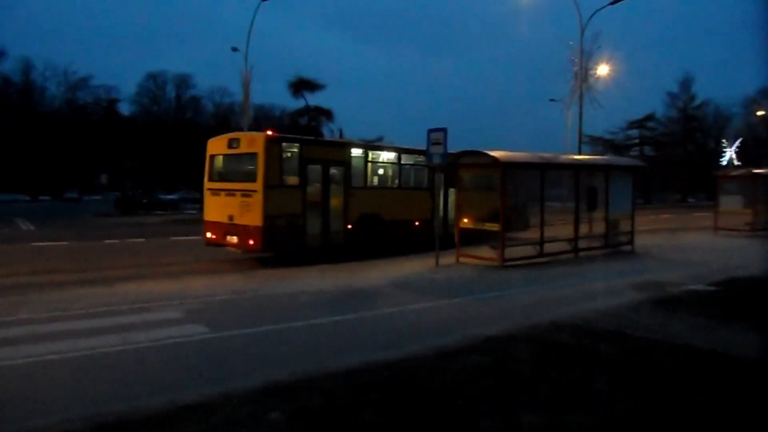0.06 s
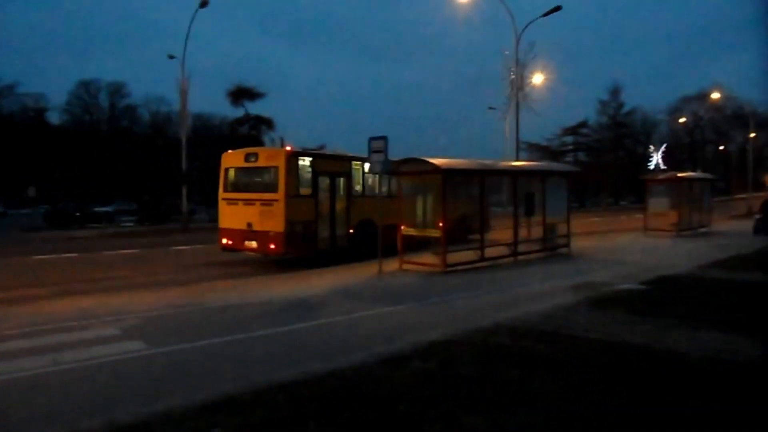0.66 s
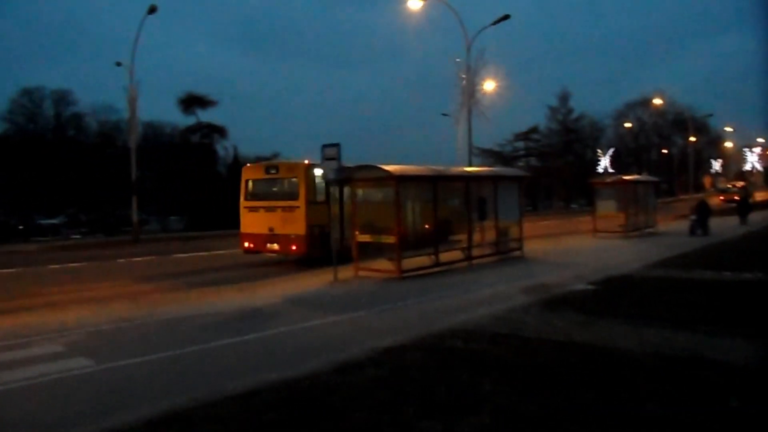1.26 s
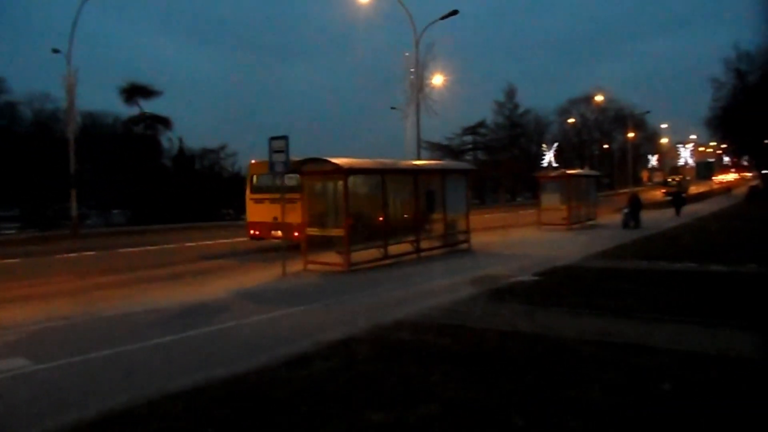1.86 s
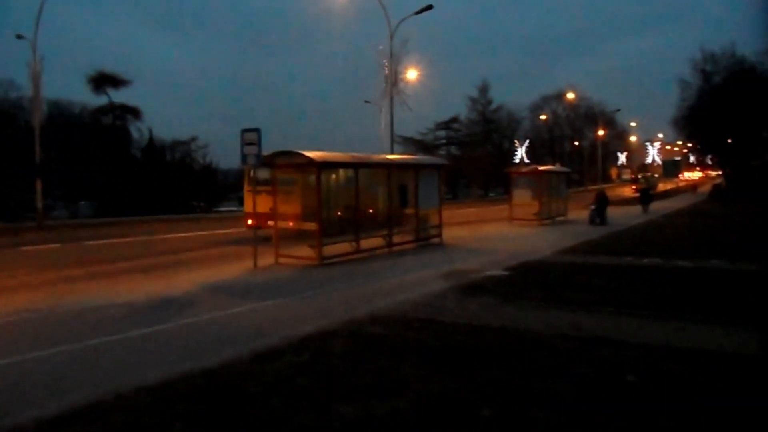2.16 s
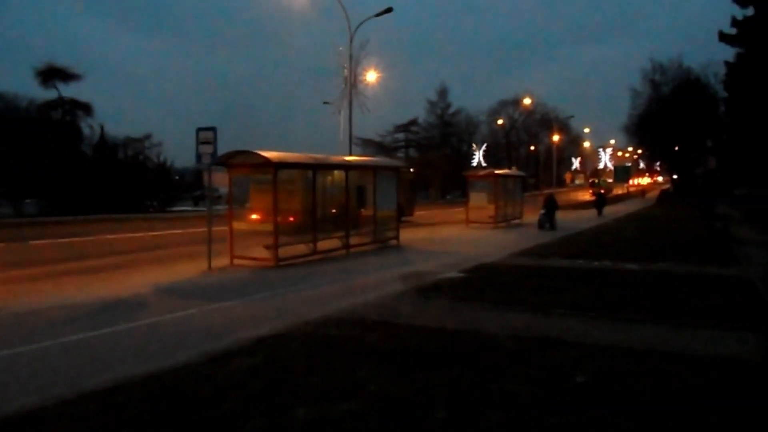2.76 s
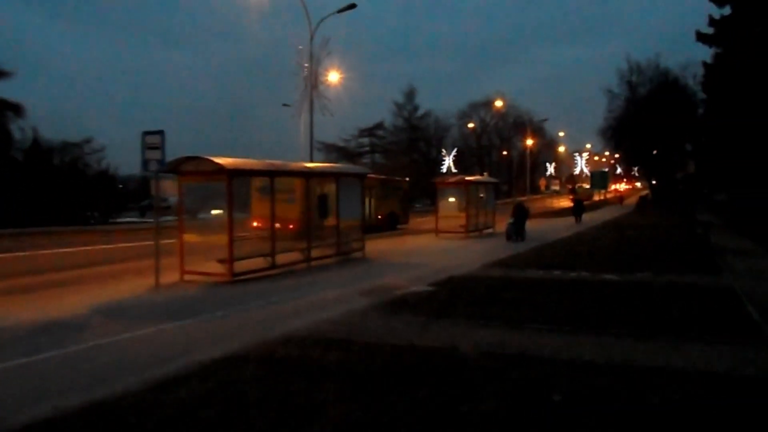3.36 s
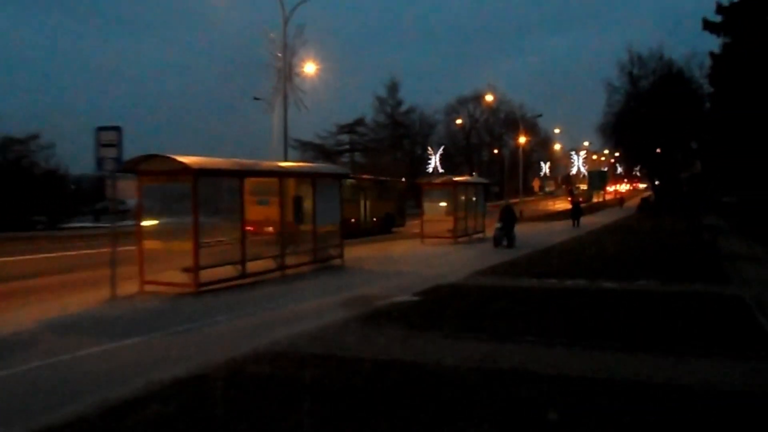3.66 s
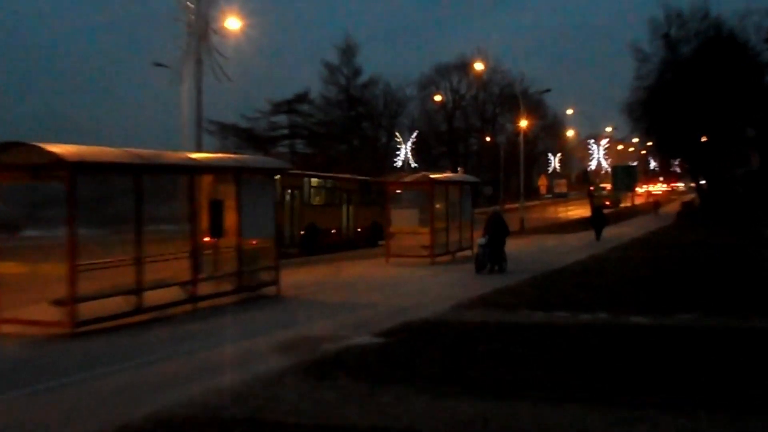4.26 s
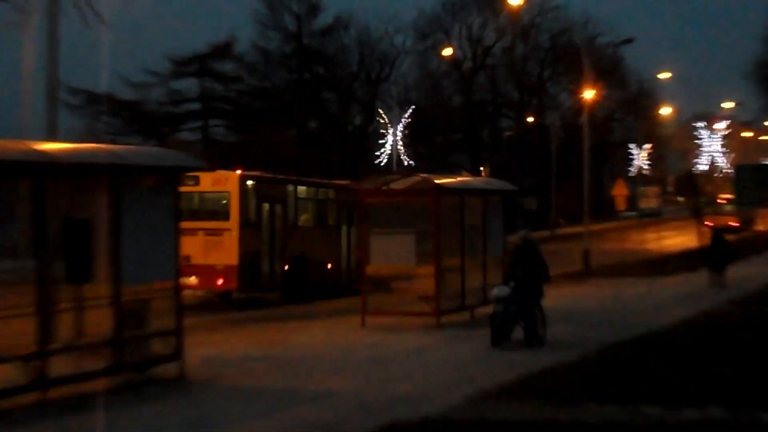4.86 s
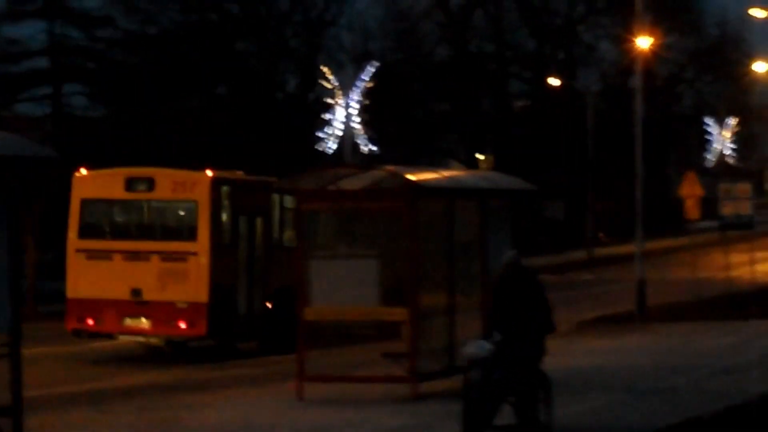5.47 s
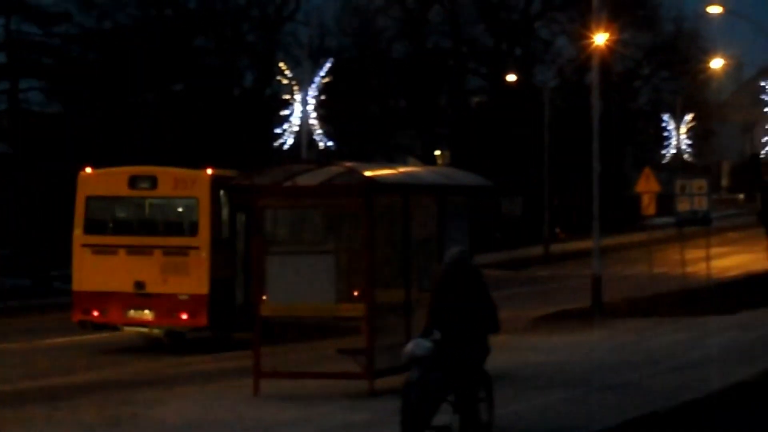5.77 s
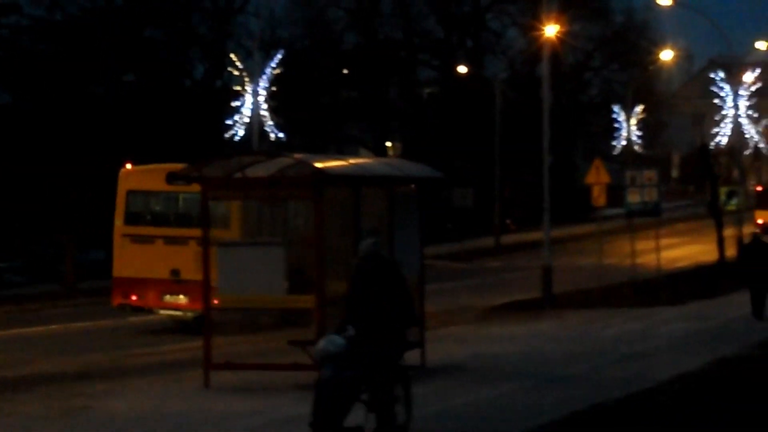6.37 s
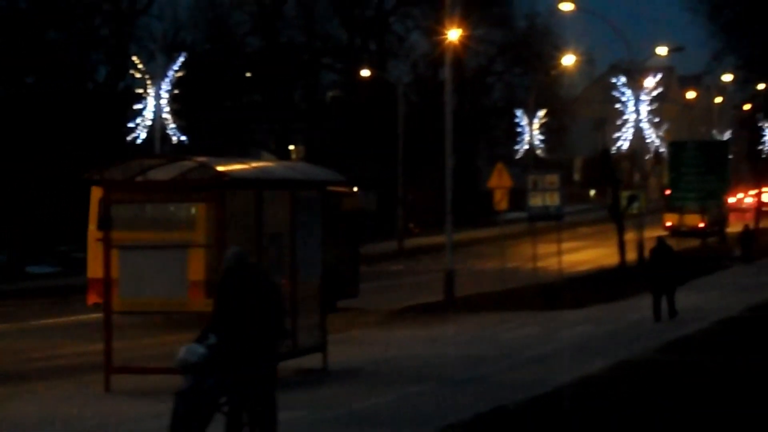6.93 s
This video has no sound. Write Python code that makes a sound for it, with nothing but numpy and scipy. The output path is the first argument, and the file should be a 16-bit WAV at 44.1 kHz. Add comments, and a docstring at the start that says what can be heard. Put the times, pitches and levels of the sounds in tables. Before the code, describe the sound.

A diesel bus is pulling away along a street from the start, with a throbbing exhaust, a clattering engine and a faint gear whine over low distant traffic. Its pitch climbs steadily until about 2.7 seconds, with chugging exhaust thumps from around 1.8 seconds and a light panel clack just after 2. Close to the microphone, a camera's zoom lever ticks at 0.3 seconds and clicks at 2.6, starting a thin lens motor whirr with small ticks. Meanwhile the engine falls in pitch and grows quieter, changing gear at about 4.6 seconds and picking up with a brief blip. At 5.3 seconds the lever snaps back with a sharp, loud click and the whirr stops. The bus drones on, duller and farther away, with low hums swelling and a few faint rattles until the end at about 7 seconds.

```python
"""A street bus stop, distant traffic beneath. A six-cylinder diesel bus revs up, changes gear, drones off.
Cylinder puffs throb in the exhaust and thump near top revs; combustion roars and clatters in the block.
A timing gear whines through its case resonances, loose panels clack, low hums swell far off.
Close by, a camera's zoom lever clicks, its lens motor whirrs and ticks, and the lever snaps back."""
import sys
import numpy as np
from scipy.fft import rfft, irfft, next_fast_len
from scipy.io import wavfile
from scipy.ndimage import uniform_filter1d, map_coordinates

SR = 44100
rng = np.random.default_rng(int(sys.argv[2]) if len(sys.argv) > 2 else 0)


def generate_wav(sig):
    """Save sig (samples, or channels by samples) to the path in sys.argv[1] as 16-bit PCM at SR."""
    pcm = np.round(np.clip(np.atleast_2d(sig).T, -1, 1) * 32767).astype(np.int16)
    wavfile.write(sys.argv[1], SR, pcm)


N = 313110

# Firing rate: t/s, f/Hz
FIRING_RATE = [(0.0, 64.06), (0.6, 74.63), (1.4, 87.64), (2.7, 103.44), (3.5, 79.76), (4.15, 65.0),
               (4.45, 60.25), (4.65, 54.21), (4.93, 70.12), (5.25, 62.5), (5.5, 65.63), (6.5, 69.96),
               (7.1, 71.44)]
# Puff departure from the mean, per cylinder: share/1
CYLINDER_BIAS = [-0.17, 0.85, -0.36, 0.69, 0.35, -0.61]
# Random puff scatter: t/s, share/1
PUFF_SCATTER = [(0, 0.37), (1.5, 0.41), (2.0, 0.72), (4.6, 0.65), (5.5, 0.31)]
# Once-per-cycle swell: t/s, amount/1
CHUG = [(0, 0), (1.6, 0.08), (1.95, 0.08), (2.6, 0.09), (3.0, 0), (7.1, 0)]
# Exhaust fundamental: t/s, level/dB
FIRING_TONE = [(0, -26), (.55, -29.5), (1.35, -26.5), (2.0, -31), (2.62, -29.5), (2.85, -23), (3.3, -24.8),
               (3.58, -33), (3.85, -31), (4.33, -26), (4.65, -34), (4.8, -25.5), (4.95, -31), (5.8, -31.5),
               (7.1, -35)]
# Exhaust overtones: f/firing rate
OVERTONE_ORDERS = [2, 8 / 3, 3]
# Same overtones at full load, on the silencer's main resonance: level/dB
OVERTONE_DB = [-21.5, -27.5, -21]
# Silencer response: f/Hz, gain/dB
SILENCER = [(120, -11.5), (138, -18), (150, -5.5), (175, 0), (193, -5.5), (206, -7.5), (235, -7.5),
            (262, -6), (280, -21.5), (310, -14)]
# Exhaust pipe, low band: f/Hz, gain/dB
THROB_BAND = [(10, -53), (22, -9), (33, 2.5), (45, 11.5), (60, 3), (85, -2), (125, 0), (155, -25),
              (300, -59), (2000, -110)]
# Exhaust pipe, middle band: f/Hz, gain/dB
BOOM_BAND = [(60, -68.5), (115, -6.5), (150, 0.5), (180, 5), (205, -0.5), (235, -12), (400, -53),
             (2000, -110)]
# Exhaust pipe, upper band: f/Hz, gain/dB
DRONE_BAND = [(120, -50), (190, -21), (220, -1), (255, 0.5), (290, -9), (350, -10), (450, -17), (900, -62),
              (3000, -110)]
# Combustion roar, up with load, down with distance: t/s, level/dB
ROAR_LEVEL = [(0, -32.5), (.5, -31), (1.0, -31.5), (1.8, -30), (2.5, -34), (2.95, -40), (3.6, -42),
              (4.6, -44.5), (4.95, -41), (5.5, -45.3), (6.0, -44), (6.5, -46), (7.1, -49)]
# Engine block response: f/Hz, gain/dB
BLOCK_RESPONSE = [(150, -28), (280, 0.5), (350, -1), (420, -6), (510, -4), (580, 1), (690, 2.5), (770, 1),
                  (860, 2.5), (1050, 0.5), (1170, -5), (1400, -16), (2200, -40.5)]
# Clatter, near: f/Hz, level/dB
CLATTER_NEAR = [(900, -24), (1400, 2), (1750, 3), (2100, -0.5), (2800, 0.5), (3350, 0), (3800, -7.5),
                (4200, -3), (5200, -15), (6500, -13.5), (8000, -18), (11000, -20), (12500, -24.5),
                (14000, -32)]
# Clatter, far: f/Hz, level/dB
CLATTER_FAR = [(900, -29), (1400, -1.5), (1750, 5), (2100, -0.5), (2800, -3.5), (3600, -15), (4100, -9),
               (4800, -18), (6300, -19), (9000, -27), (14000, -34)]
# Bus distance: t/s, far share/1
DISTANCE = [(0, 0), (2.0, 0.14), (4.5, 0.75), (7.1, 0.86)]
# Injector spit: f/Hz, level/dB
INJECTOR_SPECTRUM = [(2500, -26), (4100, 12), (5000, 0), (6500, -1), (8000, -10), (14000, -23)]
# Gear case resonance per mesh harmonic: f/Hz, width/Hz, full-load level/dB
GEAR_CASE_MODES = [(1772, 166, -42), (3370, 350, -45.5), (4580, 490, -48.5)]
# Distant traffic: f/Hz, level/dB
TRAFFIC_SPECTRUM = [(15, -44), (40, 8), (100, -11.5), (200, -2), (400, -18), (800, -20.5), (1500, -27),
                    (5000, -41), (14000, -50)]
# Lever contacts: t/s, ring level/dB, f/Hz, mode split/Hz, t60/s, crack level/dB
LEVER_CONTACTS = [(0.346, -9.5, 3330, 500, 0.0065, -33.5), (.3590, -14.5, 3300, 420, .007, -38),
                  (2.6155, -12, 3910, 680, 0.014, -12.5), (5.313, -9.5, 3240, 350, 0.0054, -39),
                  (5.3279, 0, 3300, 195, 0.027, -10), (5.333, -30, 3300, 200, .008, -23),
                  (5.334, -33, 3300, 200, .008, -23)]
# Lever crack: f/Hz, level/dB
CRACK_SPECTRUM = [(800, -11), (2300, -5), (4500, 0.5), (6300, -2.5), (7600, -13), (8800, -5), (11000, -5),
                  (13200, -1.5), (14500, -53)]
# Tailpipe modes: f/Hz, level/dB, t60/s
TAILPIPE_MODES = [(46, -21, 0.072), (123, 1.5, 0.06), (212, -3, 0.08), (259, -17, 0.07)]
# Body panel knocks: t/s, level/dB
PANEL_KNOCKS = [(2.161, -32), (6.592, -47), (6.635, -52), (7.029, -45)]
# Panel clack: f/Hz, level/dB
PANEL_SPECTRUM = [(500, -20), (900, 9), (2000, 0), (4000, -4), (8000, -15), (14000, -27)]
# Lens drive hiss: f/Hz, level/dB
LENS_SPECTRUM = [(700, -9.5), (1700, -3), (2500, 1), (3100, -6.5), (3600, 5.5), (4400, -3), (5000, -3),
                 (5450, -9), (6900, -2), (7500, -4.5), (8600, 1), (9900, -7.5), (11000, -4), (12300, -7),
                 (13200, -4.5), (14300, -10)]
# Loud lens gear ticks, the first as the drive engages: t/s, level/dB
LENS_TICKS = [(2.6149, -21.5), (3.3306, -32), (3.5918, -31), (3.6436, -32.5), (3.7847, -31), (3.8267, -34),
              (3.9482, -31.5), (4.148, -31.5), (4.2213, -32), (4.353, -32.5), (5.0195, -31.5),
              (5.2869, -29), (5.3894, -34)]
# Lens gear modes: f/Hz, level/dB, t60/s
LENS_GEAR_MODES = [(3570, 7.5, 0.006), (4930, -1, 0.0096), (8700, 0, 0.0035), (11300, 5, 0.0023),
                   (13300, 7, 0.0036)]
# Far hums: f/firing rate
HUM_ORDERS = [9.33, 4.27, 7 / 3, 2]
# One swell per hum: t/s, spread/s, level/dB
HUM_SWELLS = [(6.38, 0.54, -52.5), (5.95, 0.41, -48.5), (7.8, .55, -38), (7.1, 0.65, -37)]
# Microphone ports: f/Hz, left minus right/dB, left lead/rad, diffuse share/dB
MIC_PORTS = [(40, 0.9, .06, -29), (200, 1.43, -0.021, -27), (800, 1.1, -0.26, -31),
             (2080, -0.1, -0.036, -13.5), (4000, -5, -0.19, -11.5), (9050, -2, .1, -7)]
# Stereo image: t/s, width/1
STEREO_WIDTH = [(2.585, 1), (2.6, 0), (5.53, 0), (5.55, 1)]

CYLINDERS = len(CYLINDER_BIAS)
FULL_LOAD_DB = -31.5  # roar at full throttle beside the stop
TIME_S = np.arange(N) / SR


def amp(db):
    """Decibels to gain."""
    return 10 ** (np.asarray(db) / 20)


def unit(x):
    """Scale to rms 1."""
    return x / np.sqrt(np.mean(x ** 2) + 1e-20)


def curve(rows):
    """(t/s, value) points to one value per sample."""
    return np.interp(TIME_S, *np.transpose(rows))


def along(hz, values, at_hz):
    """Interpolate on a log frequency axis."""
    return np.interp(np.log(at_hz + 1), np.log(hz), values)


def wobble(rate_hz):
    """Smooth random curve, knots at rate_hz."""
    return map_coordinates(rng.standard_normal(int(N * rate_hz / SR) + 4), [TIME_S * rate_hz])


def swell(at_s, spread_s):
    """Bell curve of height 1."""
    return np.exp(-((TIME_S - at_s) / spread_s) ** 2)


def gate(on_s, off_s, ramp_s=0.02):
    """1 between two times, ramps outside them."""
    return np.clip(1 + np.minimum(TIME_S - on_s, off_s - TIME_S) / ramp_s, 0, 1) ** 2


def coloured(x, response):
    """Minimum-phase filter through (f/Hz, gain/dB) points."""
    size = 2 * next_fast_len(N // 2 + SR // 4)
    gain = amp(along(*np.transpose(response), np.fft.rfftfreq(size, 1 / SR)))
    cepstrum = irfft(np.log(gain))
    cepstrum[1:size // 2] *= 2
    cepstrum[size // 2 + 1:] = 0
    return irfft(rfft(x, size) * np.exp(rfft(cepstrum)))[..., :N]


def noise(spectrum):
    """Coloured noise, rms 1."""
    return unit(coloured(rng.standard_normal(N), spectrum))


def add(track, at_s, sound):
    """Mix a short sound into a track."""
    part = track[round(at_s * SR):][:len(sound)]
    part += sound[:len(part)]


def follow_db(db_per_db):
    """Level re full load of a layer that follows the roar."""
    return db_per_db * (curve(ROAR_LEVEL) - FULL_LOAD_DB)


def shelter_db():
    """A shelter screens the upper exhaust tones as the bus passes behind it."""
    return -7 * swell(6.29, 0.47)


def engine_cycle(firings):
    """One cosine period per six firings."""
    return np.cos(2 * np.pi * (firings / CYLINDERS - 0.3))


def exhaust_tones(firings):
    """The mean puff gives a firing tone; overtones sweep the silencer's resonances."""
    levels_db = [curve(FIRING_TONE)]
    for order, db in zip(OVERTONE_ORDERS, OVERTONE_DB):
        hz = order * curve(FIRING_RATE)
        load_db = follow_db(0.94 * (hz / 172.6) ** 1.62)  # off load, high ones fade most
        levels_db.append(db + along(*np.transpose(SILENCER), hz) + load_db + shelter_db())
    tones = np.zeros(N)
    for order, db in zip([1] + OVERTONE_ORDERS, levels_db):
        peak = np.sqrt(2) * amp(db + 0.7 * order * wobble(12))
        tones -= peak * np.cos(2 * np.pi * order * (firings - 0.5) + 0.18 * order * wobble(11))
    lope = 1 + (0.13 + 0.5 * curve(CHUG)) * engine_cycle(firings)
    return lope * tones


def exhaust_throb(firings):
    """Unequal puffs drive three pipe bands, filling in between the firing tones."""
    openings = np.flatnonzero(np.diff(np.floor(firings + 0.671)))  # valves lead the pressure peaks
    bias = np.resize(CYLINDER_BIAS, len(openings))
    thump = 3.3 * curve(CHUG)[openings] * (bias == max(CYLINDER_BIAS))
    scatter = curve(PUFF_SCATTER)[openings]

    def pipe(response):
        puffs = np.zeros(N)
        puffs[openings] = -bias - thump + scatter * rng.standard_normal(len(openings))
        band = coloured(puffs, response)
        running_rms = np.sqrt(np.abs(uniform_filter1d(band ** 2, size=SR // 3)) + 1e-20)
        return band / running_rms

    gear_change_db = -5.5 * swell(4.64, 0.35)
    throttle_blip_db = 6.5 * swell(4.8, 0.089)
    throb = amp(-25 + follow_db(0.6) + gear_change_db) * pipe(THROB_BAND)
    boom = amp(-29.5 + follow_db(0.59) + throttle_blip_db + shelter_db()) * pipe(BOOM_BAND)
    drone = amp(-33.5 + follow_db(1.17)) * pipe(DRONE_BAND)
    return throb + boom + drone


def block(firings):
    """Combustion roar and clatter pulse per firing and chug per cycle; distance dulls the clatter."""
    chug, far = curve(CHUG), curve(DISTANCE)
    cycle, knock = engine_cycle(firings), np.cos(2 * np.pi * firings)
    cycle_noise = rng.standard_normal(4096)
    position = firings / CYLINDERS % 1 * len(cycle_noise)
    recurring = map_coordinates(cycle_noise, [position], mode="grid-wrap")
    shake = coloured(rng.standard_normal(N) + 0.7 * recurring, BLOCK_RESPONSE)
    roar = unit(shake * (1 + 1.3 * chug * cycle + 0.097 * knock))
    roar *= amp(curve(ROAR_LEVEL) + 0.63 * wobble(12))
    clatter = np.sqrt(1 - far) * noise(CLATTER_NEAR) + np.sqrt(far) * noise(CLATTER_FAR)
    clatter = unit(clatter * (1 + 0.035 * cycle + 0.034 * knock))
    spit = amp(16) * chug * ((1 + cycle) / 2) ** 2 * noise(INJECTOR_SPECTRUM)  # one loud injector
    return roar + (clatter + spit) * amp(-40 + follow_db(0.82) + 0.72 * wobble(12))


def timing_gear(firings, teeth_per_firing=19):
    """Mesh harmonics whine as they sweep the case resonances."""
    mesh_hz = teeth_per_firing * curve(FIRING_RATE)
    whine = np.zeros(N)
    for k, (hz, width_hz, db) in enumerate(GEAR_CASE_MODES, 1):
        peak = np.sqrt(2) * amp(db + follow_db(1.8) + 2.6 * wobble(39.86))
        resonance = 1 / (1 + (2 * (k * mesh_hz - hz) / width_hz) ** 2)
        phase = 2 * np.pi * k * teeth_per_firing * firings + 0.45 * k * wobble(110)
        whine += peak * resonance * np.sin(phase)
    return whine


def traffic():
    """Distant traffic: low, wavering noise."""
    return amp(-42.5 + 2.1 * wobble(2.94)) * noise(TRAFFIC_SPECTRUM)


def zoom_lever():
    """Each plastic contact cracks and rings two close, beating modes over a weaker, lower one."""
    rings, cracks, t = np.zeros(N), np.zeros(N), np.arange(SR // 25) / SR
    for at_s, ring_db, hz, split_hz, t60_s, crack_db in LEVER_CONTACTS:
        pair = np.sin(np.pi * split_hz * t) * np.sin(2 * np.pi * hz * t)
        lower = 0.14 * np.sin(2 * np.pi * 0.716 * hz * t) * amp(-60 * t / 0.048)
        add(rings, at_s, amp(ring_db - 60 * t / t60_s) * (pair + lower))
        add(cracks, at_s, amp(crack_db - 60 * t / 0.011) * (1 - np.exp(-t / 0.0001)))
    return rings + cracks * noise(CRACK_SPECTRUM)


def tailpipe_thumps(firings, start_s=1.82, end_s=2.77, strong_db=-16.5, weak_db=-29):
    """Near top revs one heavy puff per cycle rings the tailpipe, strong and weak in turn."""
    thumps, t = np.zeros(N), np.arange(SR // 8) / SR
    ring = sum(amp(db - 60 * t / t60_s) * np.sin(2 * np.pi * hz * t) for hz, db, t60_s in TAILPIPE_MODES)
    ring *= 1 - np.exp(-t / 0.00051)
    first, last = np.interp([start_s, end_s], TIME_S, firings)
    for k, at_s in enumerate(np.interp(np.arange(first, last, CYLINDERS), firings, TIME_S)):
        add(thumps, at_s, -amp(weak_db if k % 2 else strong_db) * ring)
    return thumps


def panels(t60_s=0.087):
    """Loose body panels give short, dull clacks."""
    envelope, t = np.zeros(N), np.arange(SR // 8) / SR
    for at_s, db in PANEL_KNOCKS:
        add(envelope, at_s, amp(db - 60 * t / t60_s))
    return envelope * noise(PANEL_SPECTRUM)


def lens_motor(on_s=2.612, off_s=5.365, coast_s=0.17):
    """The drive hisses through the camera body, chirps once per screw turn, then coasts quietly."""
    screw_rad = 2 * np.pi * np.cumsum(34 + 2.27 * wobble(10)) / SR
    grip = np.tanh(wobble(20))  # tighter rub: higher, louder chirp
    chirp_hz = 6720 + 380 * grip + 170 * np.cos(screw_rad) + 110 * wobble(900)
    chirps = amp(-12.5 + 4 * grip + 7 * np.sin(screw_rad)) * np.sin(2 * np.pi * np.cumsum(chirp_hz) / SR)
    hiss = noise(LENS_SPECTRUM) * amp(1.6 * wobble(500) + 0.44 * wobble(25.37))
    drive = amp(-44) * gate(on_s, off_s) + amp(-63) * gate(off_s, off_s + coast_s)
    return drive * (hiss + chirps)


def lens_gears(soft_span_s=(2.9, 5.25)):
    """Each tick snaps and rings the gear modes; softer ticks fall at random."""
    ticks, t = np.zeros(N), np.arange(SR // 50) / SR
    soft = [(at_s, rng.normal(-33.5, 1.5)) for at_s in rng.uniform(*soft_span_s, size=22)]
    for at_s, db in LENS_TICKS + soft:
        ring = np.zeros(len(t))
        for hz, mode_db, t60_s in LENS_GEAR_MODES:
            decay = amp(mode_db + rng.normal(0, 1.7) - 60 * t / t60_s)
            ring += decay * np.sin(2 * np.pi * hz * rng.normal(1, 0.033) * t)
        snap = 0.5 * amp(-60 * t / 0.0055) * rng.standard_normal(len(t))
        add(ticks, at_s + 0.00103, amp(db) * (ring + snap) * (1 - np.exp(-t / 0.00033)))
    return ticks


def far_hums(firings):
    """Low tones locked to engine speed swell far off."""
    hums = np.zeros(N)
    for order, (at_s, spread_s, db) in zip(HUM_ORDERS, HUM_SWELLS):
        peak = np.sqrt(2) * swell(at_s, spread_s) * amp(db + 2.5 * wobble(14))
        hums += peak * np.sin(2 * np.pi * order * firings + 0.6 * wobble(25))
    return hums


def microphones(x, t60_s=0.28):
    """Two close ports hear nearly the same; scattered reflections part them in the treble."""
    size = next_fast_len(N + SR // 4)
    hz, *columns = np.transpose(MIC_PORTS)
    pan_db, lead_rad, diffuse_db = [along(hz, c, np.fft.rfftfreq(size, 1 / SR)) for c in columns]
    t = np.arange(SR // 4) / SR
    echoes = rng.standard_normal(len(t)) * amp(-60 * t / t60_s)
    direct = np.tanh((np.log(amp(pan_db)) + 1j * lead_rad) / 2)
    side = direct + amp(diffuse_db) * rfft(echoes / np.linalg.norm(echoes), size)
    return irfft(rfft(x, size) * np.array([1 + side, 1 - side]), size)[:, :N]


def scene():
    """Bus, traffic and camera mechanics, in stereo."""
    firings = np.cumsum(curve(FIRING_RATE)) / SR  # running count
    bus = exhaust_tones(firings) + exhaust_throb(firings) + block(firings) + timing_gear(firings)
    bus += tailpipe_thumps(firings) + far_hums(firings) + panels()
    return microphones(bus + traffic() + lens_motor() + lens_gears() + zoom_lever())


def record(dry, top_hz=14300):
    """The camera folds to mono during the zoom and passes nothing above top_hz."""
    mid = dry.mean(axis=0)
    folded = mid + curve(STEREO_WIDTH) * (dry - mid)
    size = next_fast_len(N + SR // 4)
    passband = np.fft.rfftfreq(size, 1 / SR) < top_hz
    return irfft(rfft(folded, size) * passband, size)[:, :N]


dry = scene()
out = record(dry)
generate_wav(out)
```